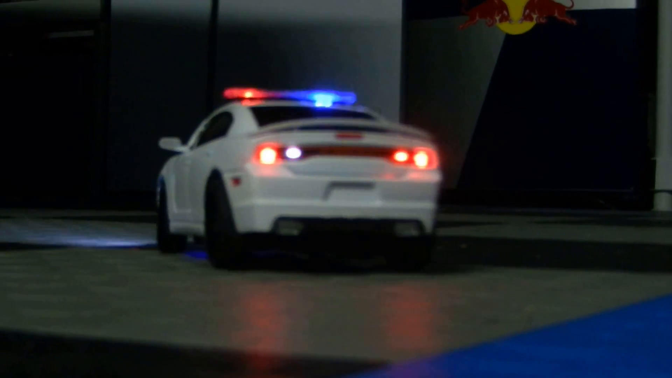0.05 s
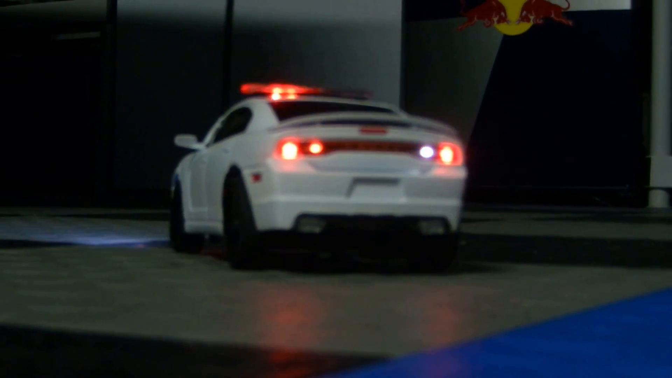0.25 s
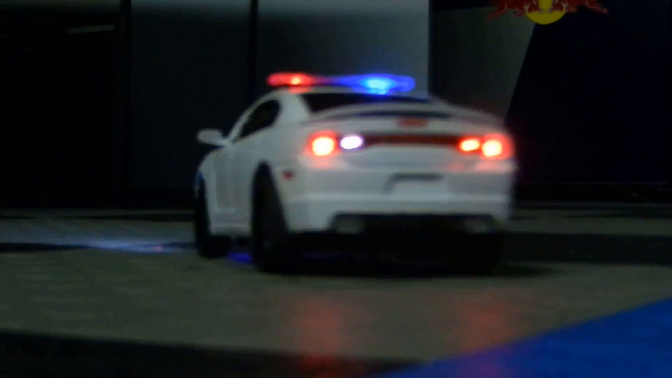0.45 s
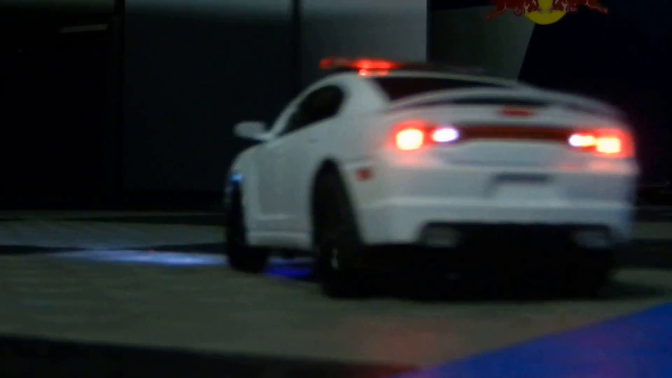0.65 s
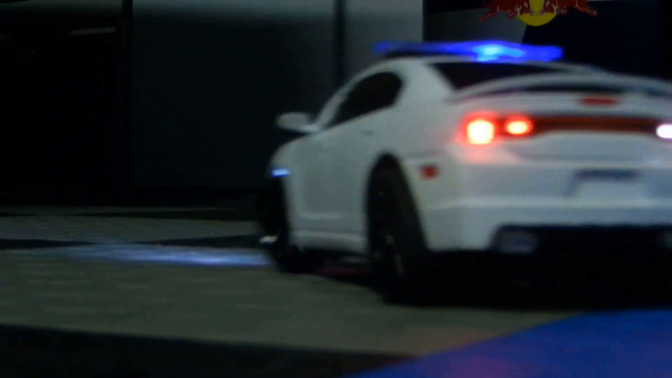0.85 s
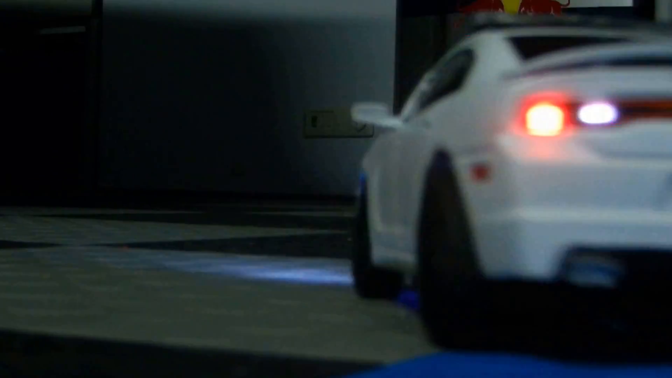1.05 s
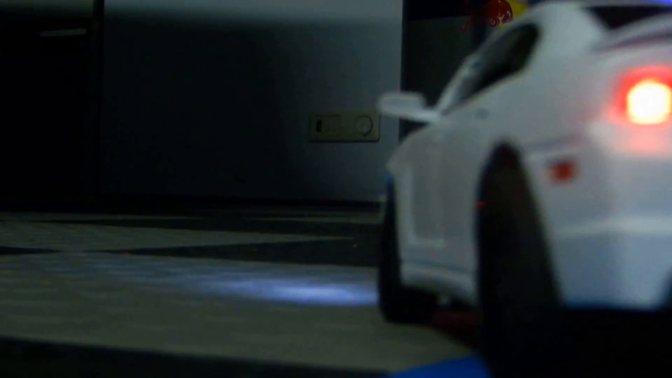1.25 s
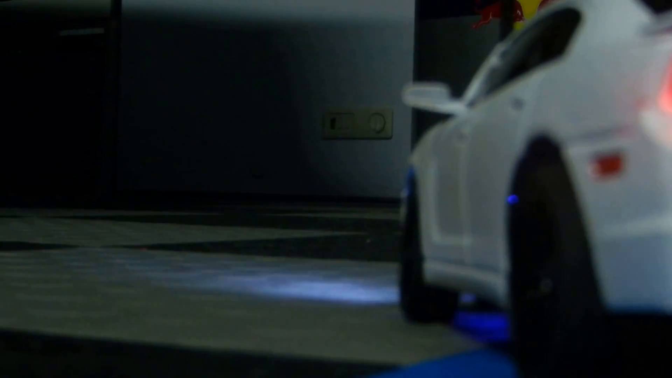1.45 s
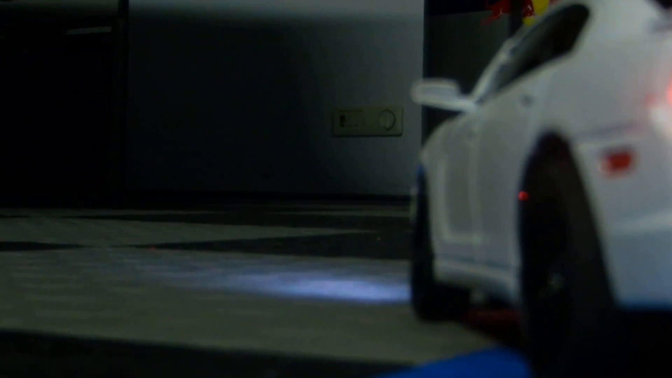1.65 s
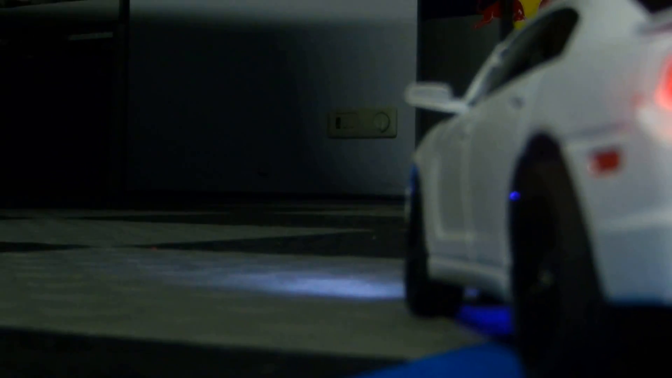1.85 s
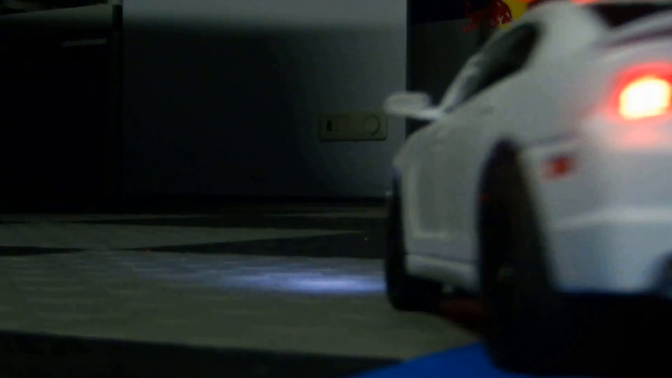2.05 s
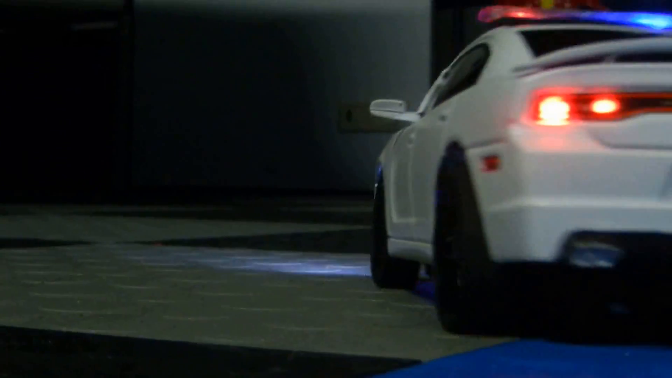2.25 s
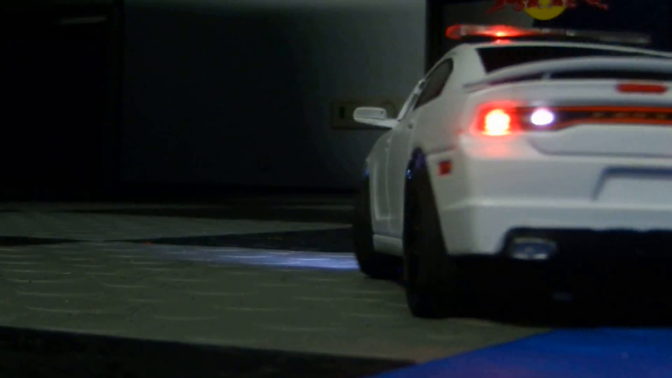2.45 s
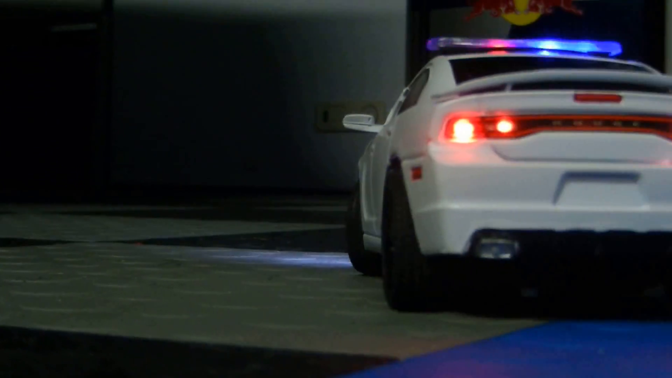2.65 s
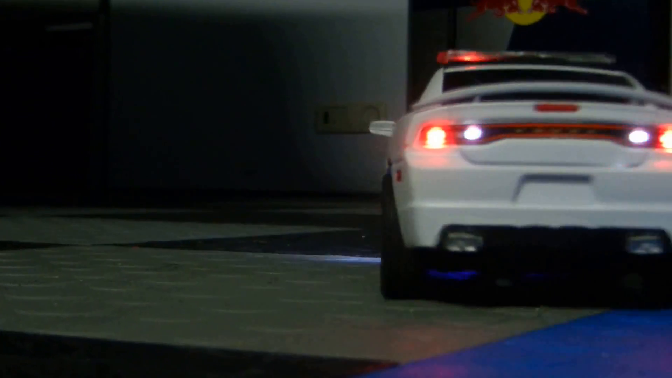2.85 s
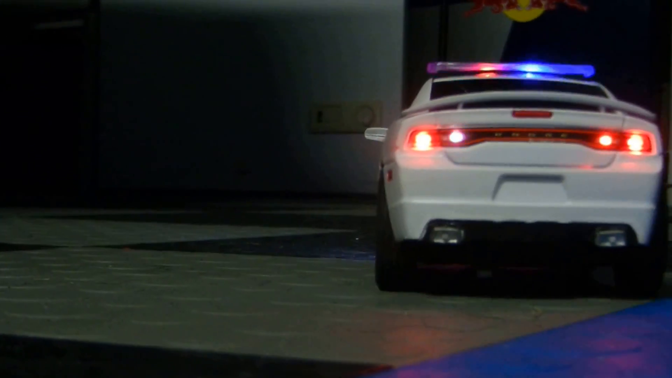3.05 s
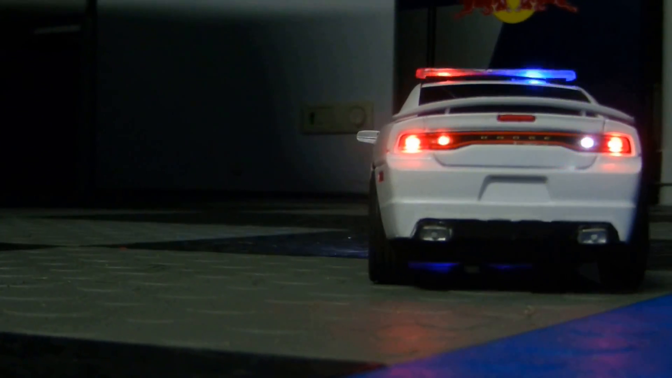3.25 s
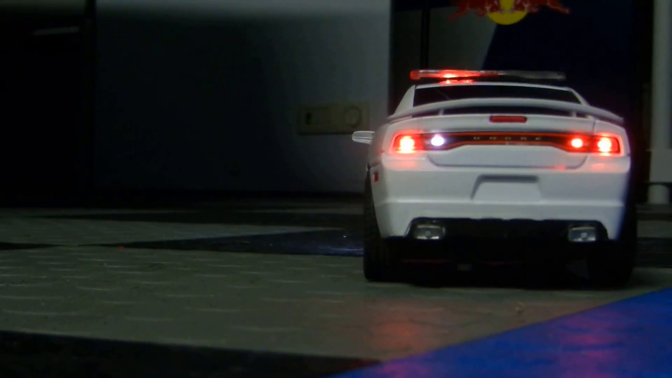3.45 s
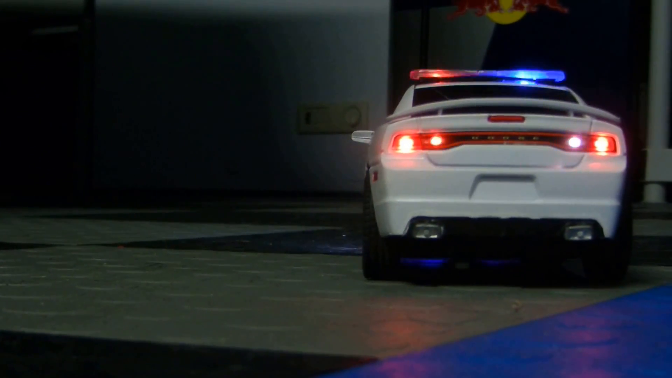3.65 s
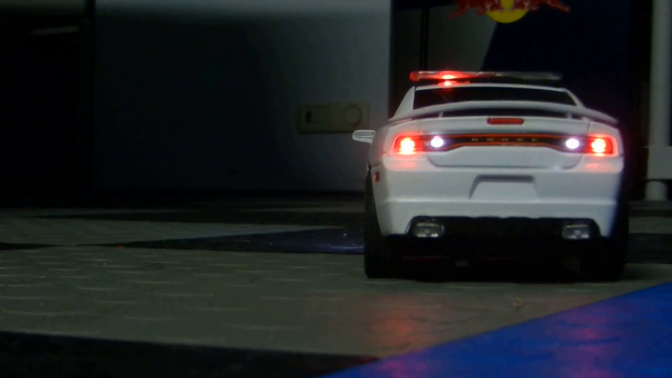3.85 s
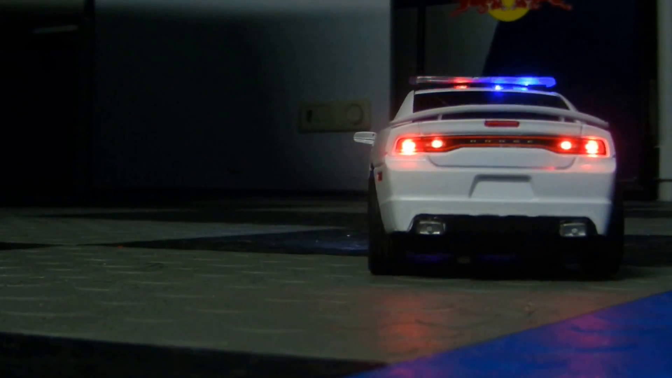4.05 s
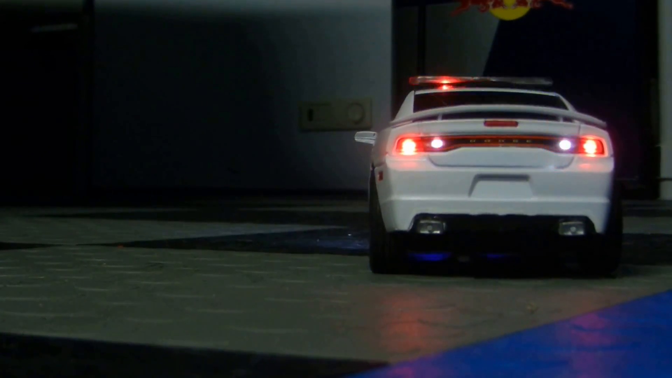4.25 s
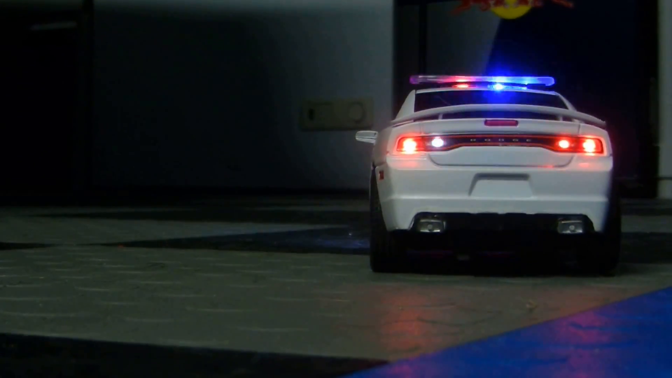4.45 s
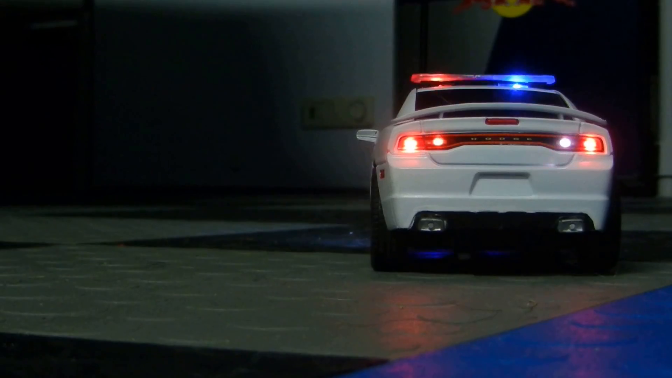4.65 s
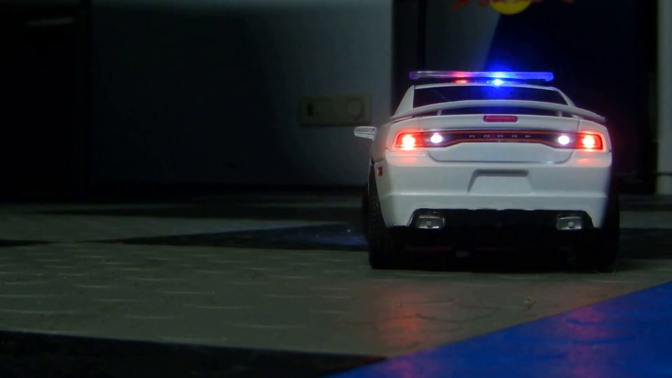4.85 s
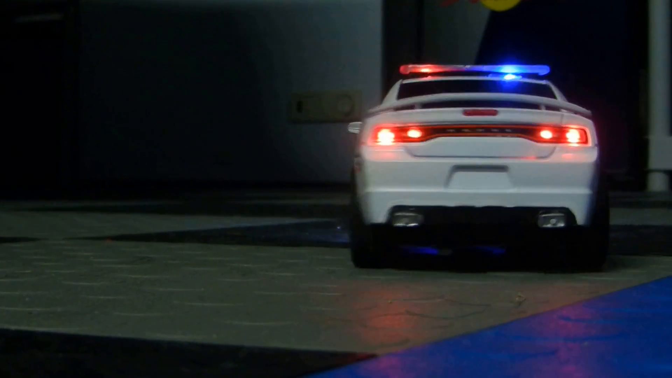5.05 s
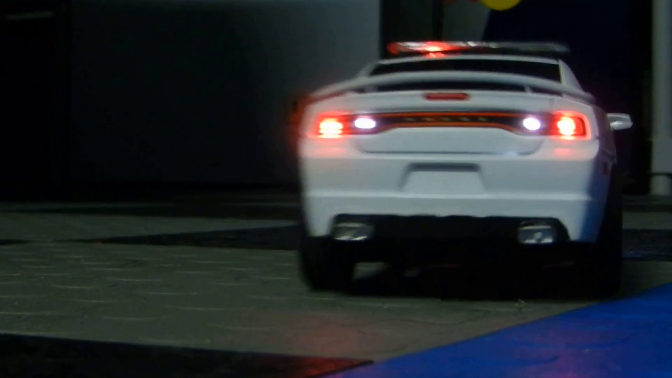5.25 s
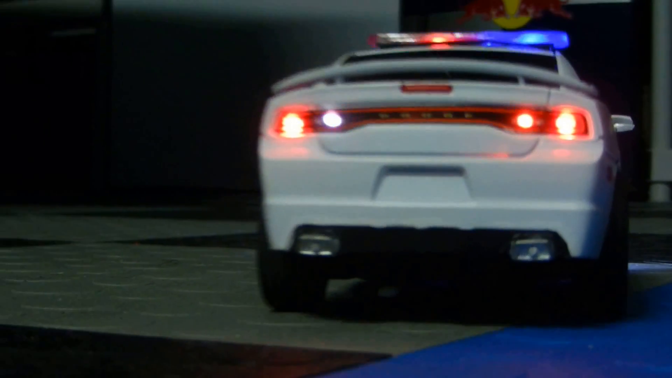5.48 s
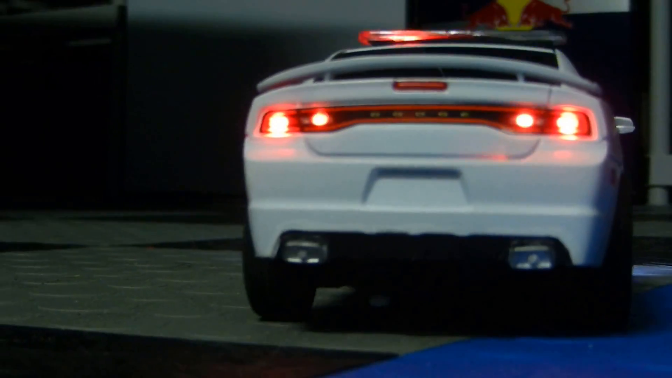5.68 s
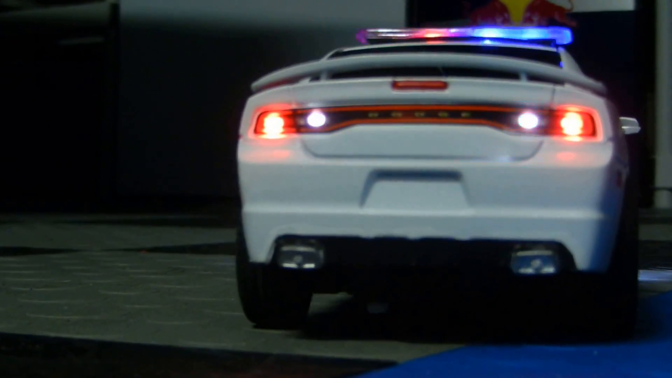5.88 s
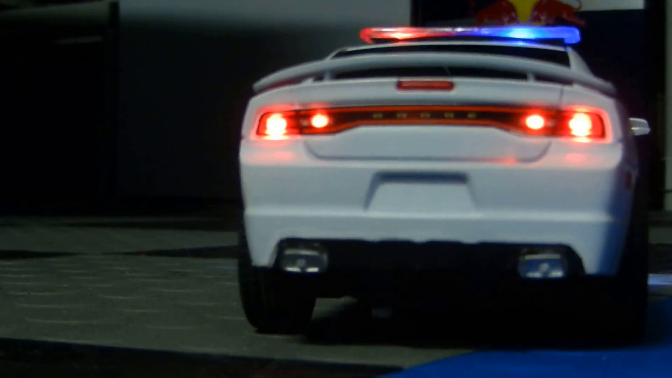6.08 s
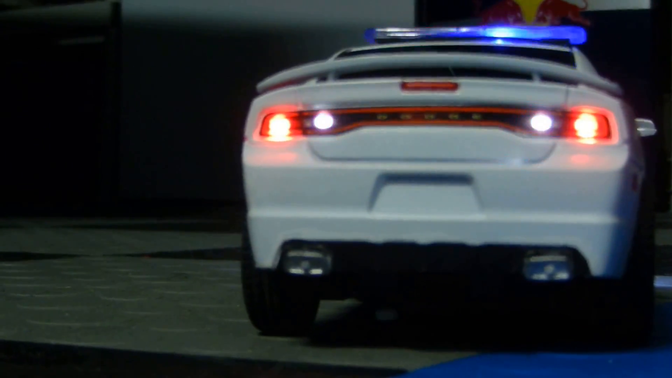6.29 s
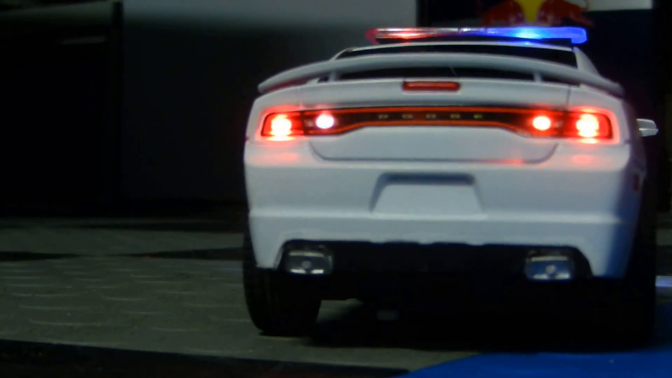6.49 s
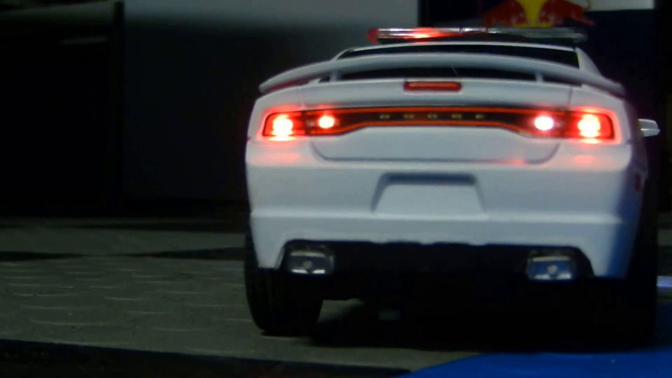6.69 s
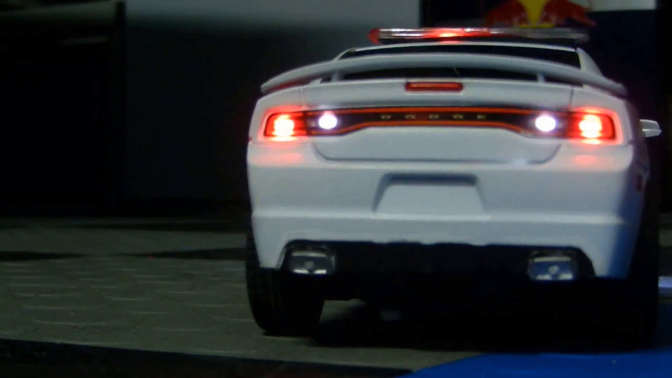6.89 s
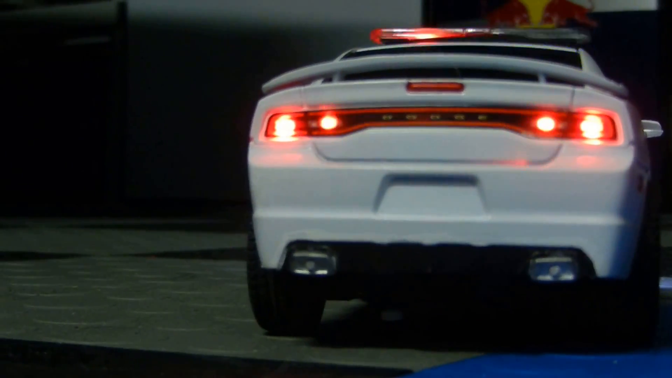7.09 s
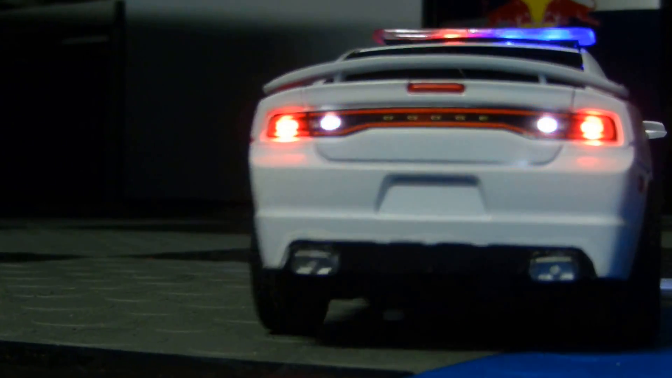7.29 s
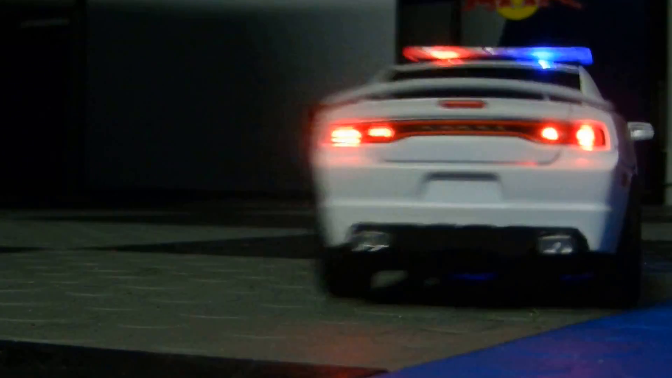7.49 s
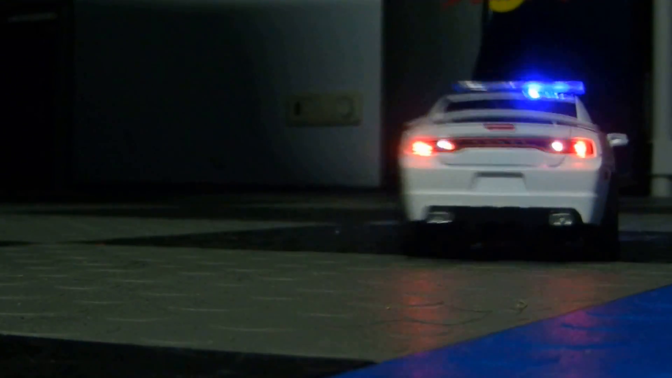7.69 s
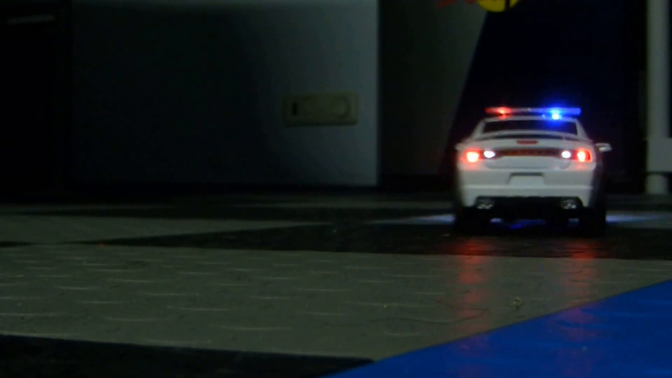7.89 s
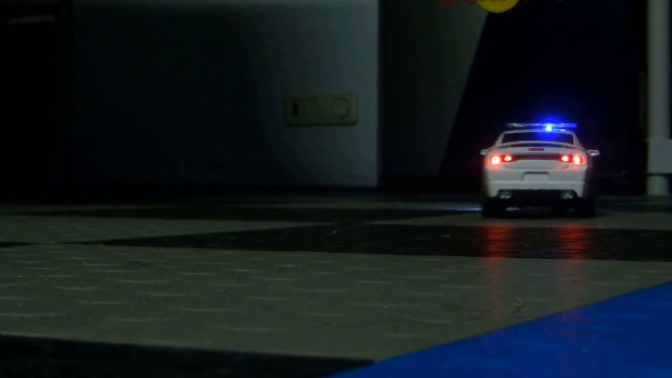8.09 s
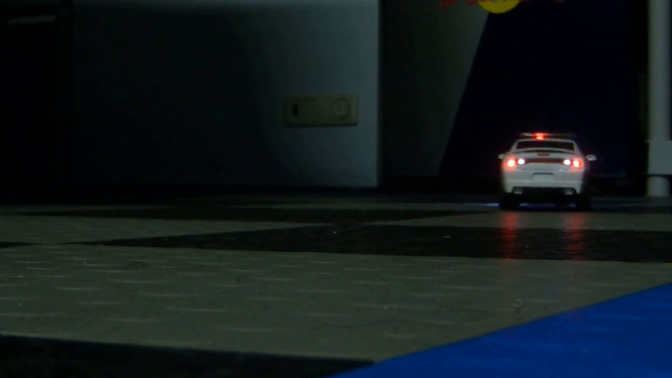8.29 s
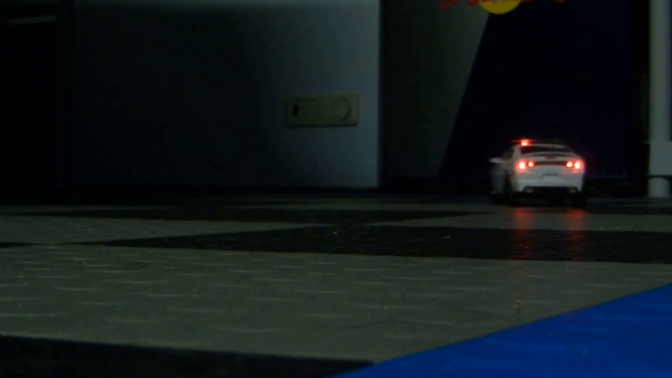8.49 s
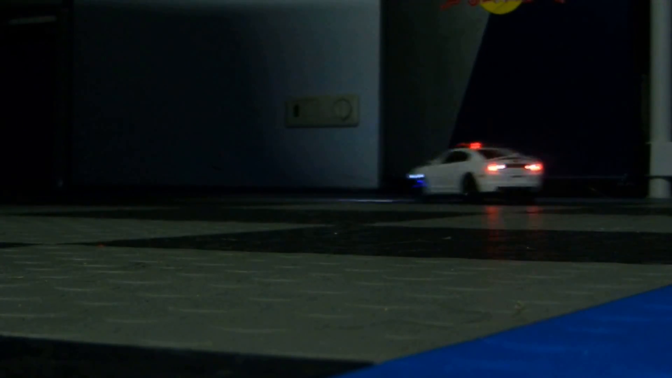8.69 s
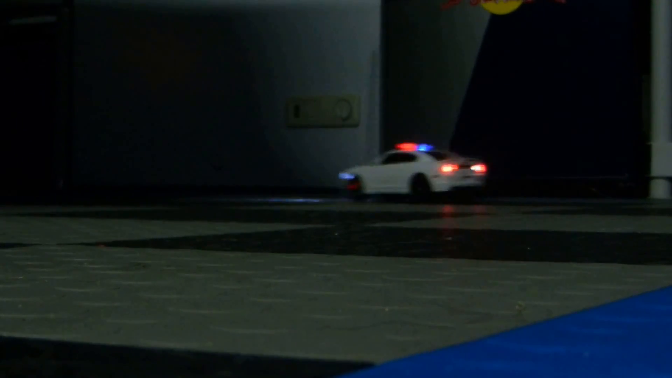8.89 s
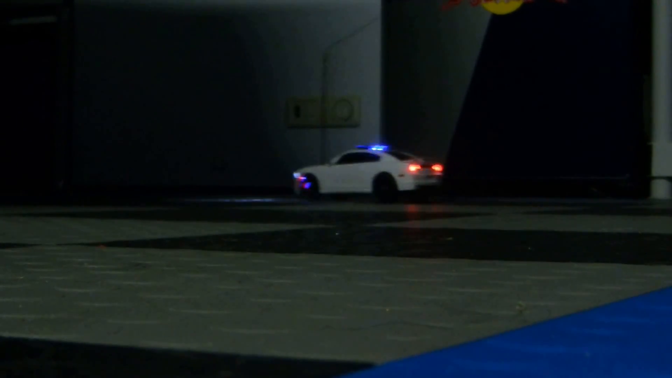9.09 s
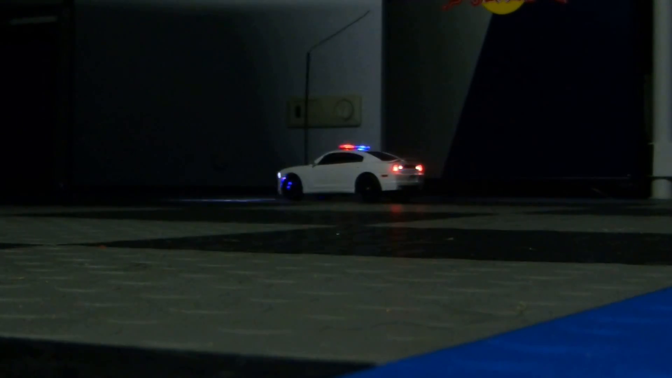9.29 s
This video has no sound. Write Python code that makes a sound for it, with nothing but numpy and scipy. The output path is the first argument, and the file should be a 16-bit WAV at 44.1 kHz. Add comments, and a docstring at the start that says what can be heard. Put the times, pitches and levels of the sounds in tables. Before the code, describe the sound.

Close-up in a quiet reflective indoor space, a remote-control car jerks about: short raspy motor bursts, plastic steering clicks, chattering gears and hollow body knocks, separated by quiet pauses with faint ticks. Finally it accelerates hard away, the gear whine climbing with low tyre rumble and body drone, then slows into chattering knocks and fades. Sound leans to the right.

```python
"""A brief plastic whir fades in quiet room air: a remote-control toy car drives a hard indoor floor in bursts.
Motor speed times the gear teeth, which rattle, whine and shake the hollow body; tyre noise rumbles below.
Shaped noise makes the clicks, knocks and clatter, while decaying sines ring the gearbox and shell.
Then the car speeds off and coasts; a synthetic room answers, louder on the right than on the left."""
import sys
import numpy as np
from scipy import signal
from scipy.fft import rfft, irfft
from scipy.io import wavfile
from scipy.ndimage import uniform_filter1d

SR = 44100
rng = np.random.default_rng(int(sys.argv[2]) if len(sys.argv) > 2 else 0)


def store_wav(level_fs):
    """Save 16-bit WAV to argv[1]."""
    pcm = np.round(np.clip(np.atleast_2d(level_fs), -1, 1) * 32767)
    wavfile.write(sys.argv[1], SR, pcm.T.astype(np.int16))


N = 411453
TIME = np.arange(N) / SR
SIDE_SIGNS = np.array([[1], [-1]])   # side adds to the left and subtracts from the right

# Table levels are relative: each sound adds its own trim where it is made.
# quiet room air: [f/Hz, level/dB per Hz], and its width: [f/Hz, side level/dB]
AIR_COLOUR = [(30, -38), (60, -10.5), (115, 5), (180, -8), (250, -10), (390, 1.5), (550, -7), (900, -11.5),
              (1300, -11.5), (1900, -13), (2800, -14), (4000, -19.5), (8000, -25.5), (15500, -28.5)]
AIR_WIDTH = [(100, -1), (500, 3), (2000, 2), (6000, 2)]
AIR_DB = -51.5

# short pushes of the throttle: [on t/s, off t/s, teeth meeting per s at release,
# gear level/dB at start, at release, body level/dB at start, at release]
THROTTLE_BURSTS = [(-.05, 0.069, 450.2, -37, -37, -39, -40), (.228, .268, 360.9, -27.5, -39, -27.5, -40.5),
                   (.443, 0.621, 520.2, -33, -28.5, -30.5, -27.5),
                   (0.881, 1.001, 521.1, -21, -27.5, -28.5, -25),
                   (2.037, 2.151, 429.9, -41.5, -31, -37, -30),
                   (2.756, 2.776, 298.9, -40, -40.5, -36.5, -44), (2.823, 2.902, 408.5, -36, -36, -41, -32),
                   (3.863, 3.961, 298.9, -42.5, -43.5, -40.5, -40.5),
                   (5.044, 5.22, 509, -31.5, -25, -33, -25.5)]
KICK_TEETH_PER_S, ATTACK_S = 250, 0.00081   # the motor leaps to at least this speed at once
COAST_S = 0.55   # time constant of slowing down with the throttle off
UNLOADED_DROP_DB, UNLOAD_S = 3, 0.034   # the gears quieten as the load comes off
GEAR_FADE_DB_PER_S, BODY_FADE_DB_PER_S, TYRE_FADE_DB_PER_S = 49, 49.5, 54
TYRE_OFFSET_DB = -14   # tyre setting against body setting, before their trims

# motor speed of the long run away: [t/s, teeth meeting per s]
GETAWAY_TOOTH_RATE = [(7.33, 260), (7.43, 760), (7.55, 975), (7.72, 1035), (7.9, 1250), (8.14, 1434),
                      (8.32, 1200), (8.75, 950), (9.33, 500)]
# loudness of the long run away: [t/s, gear level/dB, body level/dB, tyre level/dB]
GETAWAY_LOUDNESS = [(7.34, -55, -44, -46), (7.416, -33, -33.5, -56), (7.488, -24, -28.5, -40),
                    (7.844, -20, -20, -38), (8.032, -23, -17, -43), (8.17, -23.5, -20.5, -44),
                    (8.24, -25, -26.5, -47), (8.32, -27.5, -26.5, -42), (8.42, -24, -23, -54),
                    (8.51, -26.5, -25, -51), (8.62, -32, -32, -40), (8.71, -34, -27.5, -42.5),
                    (9.112, -43.5, -46, -61), (9.33, -47, -53, -61)]
# overall trim of that run: [gear level/dB, body level/dB, tyre level/dB]
GETAWAY_TRIM = (-0.5, 2, -1)

# the car backs up between these times: [from t/s, to t/s]
BACKING_TIMES = [(0.1, 1.9), (4.9, 5.9)]
# gear noise in reverse, driving forward and spinning freely: [f/Hz, level/dB per Hz]
REVERSE_COLOUR = [(350, -18), (750, -5), (1040, 1.5), (1300, -5), (2000, 0.5), (2700, -0.5), (3250, 2),
                  (3700, -3.5), (4200, -14), (8000, -50)]
FORWARD_COLOUR = [(500, -8.5), (900, -3.5), (1090, 3.5), (1260, 2), (1490, 8), (1780, 2.5), (2050, 7.5),
                  (2280, 13), (2600, 2), (2900, 6), (3250, 2), (3700, 5), (4400, 1), (5000, -14),
                  (8000, -61)]
FREE_COLOUR = [(350, -13), (800, -0.5), (1150, 4), (1450, 1), (2300, 3.5), (3100, -5), (4200, -9.5),
               (8000, -58.5)]
# lines of the gear whine: [multiple of the tooth rate, level/dB]
WHINE_LINES = [(2, 4), (3, 2), (4, 0.5)]
WHINE_REVERSE_DB, WHINE_FORWARD_DB, WHINE_FREE_DB = -4, -1, -12   # against the rattle
WHINE_WAVER_DB = 1
GEAR_TEETH = 13

# tooth hiss, hollow body drone and tyre rumble: [f/Hz, level/dB per Hz]
HISS_COLOUR = [(3000, -18), (5000, 8.5), (6800, 5), (8200, -3.5), (10500, -3), (14000, -9), (16000, -33)]
BODY_COLOUR = [(150, -46), (260, -27), (330, -7.5), (375, 1.5), (435, 2.5), (500, 0.5), (570, -4.5),
               (650, -8), (760, -14), (1100, -20), (2500, -100)]
TYRE_COLOUR = [(25, -46), (45, -25), (70, 3), (120, 8), (200, 1), (300, -6), (600, -35)]
HISS_BELOW_GEARS_DB, HISS_SLACK_LOSS_DB = 9, 8.5   # the teeth hiss less when they turn slowly

# decay of the room's tail: [f/Hz, t60/s]
TAIL_DECAY = [(100, 1.5), (450, 0.3), (2300, 1.5), (6000, 0.96), (14000, 0.9)]
# strength of the tail and of the early scatter: [f/Hz, level/dB]
TAIL_STRENGTH = [(100, -9.5), (450, -11.5), (1100, -7), (2300, -4.5), (6000, -5.5), (14000, -6.5)]
EARLY_STRENGTH = [(100, -1), (450, -2.5), (2000, -5), (5000, -2), (12000, 3)]
# width of the reflections, narrow in the lows: [f/Hz, side level/dB]
ROOM_WIDTH = [(120, -4.5), (400, -9.5), (2000, -8), (6000, 0.5)]
SMALL_PARTS_ROOM_DB, THUMP_ROOM_DB, CLATTER_ROOM_DB = -3, -3, 0   # sends to the room

# clicks of steering and loose plastic: [t/s, clack level/dB, snap level/dB, crack level/dB]
CLICK_HITS = [(0.146, -14.5, -20.5, -33.5), (0.207, -10, -40, -49), (0.393, -13.5, -18, -30),
              (0.446, -14, -60, -54), (0.811, -17.5, -19.5, -30.5), (0.887, -12, -24, -50),
              (0.935, -19, -16.5, -28.5), (1.933, -29.5, -40, -54), (2.042, -20, -31.5, -40),
              (3.868, -34, -30, -46), (4.581, -25.5, -47, -53), (4.681, -28, -40.5, -55),
              (4.708, -21.5, -30, -48), (4.99, -21, -23.5, -35.5), (6.998, -18.5, -25.5, -43)]
# their colours: [f/Hz, level/dB per Hz]
CLACK_COLOUR = [(200, -44), (600, -4), (1200, 5.5), (1750, -3), (2600, -10), (6000, -32)]
SNAP_COLOUR = [(1000, -5), (2000, 8), (2700, 5), (3300, 9), (4400, -2), (7000, -26)]
CRACK_COLOUR = [(3000, -36), (5500, 11.5), (7500, 8), (10000, 0), (15500, -18)]

# jolts through the drive train: [t/s, thump level/dB, clatter level/dB, crack level/dB]
JOLT_HITS = [(.260, -15, -32, -43), (0.446, -14, -49, -60), (1.003, -15, -40, -55), (1.014, -8, -29, -37),
             (2.462, -25, -21.5, -22.5), (2.4638, 0, -21, -24.5), (2.479, -8.5, -28.5, -39),
             (3.871, -20.5, -44, -60), (4.811, -31, -21, -21), (4.815, -12, -35, -37),
             (4.823, -15, -18, -26), (4.837, -15, -26, -45), (5.048, -19, -29, -57), (7.0939, -8, -16, -24),
             (7.1, -24, -24.5, -37), (7.1059, -6, -25, -42), (7.125, -18, -40, -55),
             (7.330, -24.5, -34.5, -62)]
# ringing of the hollow body after a jolt: [f/Hz, level/dB, t60/s]
SHELL_MODES = [(118, -14, .14), (345, -7, .08), (388, -4, .09), (436, -1, .11), (510, -4, .07),
               (660, -9, .06)]
PUNCH_HZ, PUNCH_PEAK_S = 475, 0.0027   # the shell flexes for a few cycles
RING_TRIM_DB, RING_RISE_S = -15, 0.007
# colours of the jolt's clatter and crack: [f/Hz, level/dB per Hz]
CLATTER_COLOUR = [(150, -6), (600, 1), (1200, -4), (2100, 2), (3000, -6), (5200, -16), (7500, -22),
                  (11000, -29), (15500, -37)]
JOLT_CRACK_COLOUR = [(1500, -14), (3500, -1), (5400, 6), (7200, -8), (10500, 1), (14000, -7.5),
                     (16000, -16)]

# a loose gear knocks about in its play: [t/s, clack level/dB, rasp level/dB]
LOOSE_GEAR_HITS = [(.576, -26, -27.5), (.680, -37, -25.5), (0.76, -48, -27), (0.914, -22, -36),
                   (.984, -20, -21.5), (1.023, -19, -21), (1.041, -29, -20.5), (1.083, -36, -22.5),
                   (1.107, -29, -25.5), (1.132, -45, -25.5), (1.140, -38, -28), (1.163, -51, -27.5),
                   (1.199, -48, -28), (1.229, -40, -29.5), (1.238, -34, -31), (1.267, -37.5, -23.5),
                   (1.310, -42, -29), (1.366, -54, -35), (1.435, -48, -40), (1.477, -31.5, -54),
                   (1.488, -35.5, -35), (1.68, -42, -43.5), (1.739, -48, -41), (2.096, -44, -27.5),
                   (2.125, -46, -21), (2.143, -45, -27), (2.167, -30, -21.5), (2.202, -31, -31),
                   (2.231, -30, -30.5), (2.259, -31, -36), (2.288, -41, -36), (2.328, -27, -33),
                   (2.362, -25.5, -27.5), (2.861, -54, -31), (2.960, -37, -39), (2.993, -32, -40),
                   (3.035, -39, -41), (3.082, -40.5, -42), (3.136, -35, -46), (3.909, -54, -37),
                   (3.955, -35, -40), (4.007, -39, -48), (4.086, -39, -55), (4.240, -46, -52),
                   (5.165, -28, -42), (5.213, -23, -27), (5.253, -45, -25), (5.299, -37, -31),
                   (5.321, -36, -30), (5.363, -43, -30.5), (5.386, -39, -26), (5.408, -36, -28),
                   (5.441, -48, -30), (5.508, -37, -30), (5.545, -29.5, -33.5), (5.587, -27.5, -31.5),
                   (5.614, -31, -36), (7.428, -34, -28), (8.777, -31, -32), (8.918, -31, -28.5),
                   (9.045, -33, -33), (9.178, -33, -47), (9.246, -39, -40)]
# its colours: [f/Hz, level/dB per Hz]
GEAR_CLACK_COLOUR = [(250, -25), (450, -11), (750, -5.5), (1180, 2.5), (1700, -6), (2600, -26), (6000, -27),
                     (14000, -45)]
GEAR_RASP_COLOUR = [(900, -20), (1600, 2.5), (2300, 5.5), (3000, 1.5), (4300, -6.5), (5200, -10.5),
                    (7500, -18.5), (10000, -19.5), (15000, -43)]
# ringing of the gearbox under a knock: [f/Hz, level/dB, t60/s]
GEARBOX_RING = [(1590, -7, .025), (2137, -2, 0.032), (2365, 0, 0.032), (2743, -5, 0.024),
                (3060, -3.5, 0.025), (3490, -7, 0.018), (3760, -7, 0.022), (4400, -5, .018)]

# rough floor shakes the car: [t/s, body level/dB, gear level/dB, tyre level/dB]
FLOOR_SPOTS = [(.615, 5.5, 1, -1), (2.92, 3.5, 3, 5), (7.645, 8.5, 1, 0), (8.13, 3, 1, 1),
               (8.205, 4, 1.5, 9), (8.285, 8.5, 2, 6), (8.371, 6, -3.5, -5), (8.495, 6.5, 0.5, 0)]
ROUGH_SPOT_S = 0.028   # half width of the change, at 1/e

# faint hollow ticks while the car stands or creeps: [t/s, level/dB]
TICK_HITS = [(1.4964, -39), (1.6094, -30.5), (1.6962, -39), (1.7701, -36.5), (1.9036, -37), (4.3395, -42),
             (4.6925, -28), (6.074, -42), (6.1404, -45), (6.2073, -48), (6.2736, -43), (6.341, -47),
             (6.4068, -45), (6.4737, -43), (6.5071, -45), (6.6074, -47), (6.7072, -41), (6.8079, -44),
             (6.9082, -46), (9.1775, -28.5)]
# what a tick rings with: [f/Hz, level/dB, t60/s]
TICK_RING = [(1125, -5, .035), (1290, -1, 0.038), (1483, -1, 0.028)]

# the loose gear knocks once per turn while coasting at speed
CHATTER_ABOVE_TEETH_PER_S = 560
CHATTER_TRIM_DB, CHATTER_SPREAD_DB = 2, 2   # trim over the gear setting, at 450 teeth per s
CHATTER_DB_PER_HALVING = 5.5   # it stands out more with every halving of the speed

# the left ear against the right: [f/Hz, level/dB]
LEFT_EAR_COLOUR = [(100, -1.5), (350, -4), (1500, -4.5), (2800, -3.5), (4500, -1), (8000, 2), (12000, -2.5)]
CUTOFF_HZ = 15900


def from_db(db):
    """Decibels to an amplitude factor."""
    return 10 ** (np.asarray(db) / 20)


def rms_one(x):
    """Scales a sound to rms 1."""
    return x / np.sqrt(np.mean(x ** 2) + 1e-20)


def in_time(rows):
    """Each column of a curve at every sample."""
    s, *columns = np.transpose(rows)
    return [np.interp(TIME, s, column) for column in columns]


def at_hz(points, hz):
    """A spectrum read on a log-frequency axis."""
    f, value = np.transpose(points)
    return np.interp(np.log(np.maximum(hz, 1)), np.log(f), value)


def drift(rate):
    """Slow chance with spread 1, drawing the given number of new values per second."""
    knots = rng.standard_normal(N // 10)
    return rms_one(np.interp(TIME * rate, np.arange(len(knots)), knots))


def colour(x, spectrum, size=4096):
    """Causal (minimum-phase) filter with the given spectrum."""
    gain = from_db(at_hz(spectrum, np.fft.rfftfreq(size, 1 / SR)))
    cepstrum = irfft(np.log(gain))
    # folding the cepstrum forward gives minimum phase
    cepstrum[1:size // 2] *= 2
    cepstrum[size // 2 + 1:] = 0
    return signal.oaconvolve(x, irfft(np.exp(rfft(cepstrum))))[:len(x)]


def evened(x, span):
    """Holds the rms near 1 over the given span in seconds."""
    power = np.abs(uniform_filter1d(x ** 2, int(span * SR)))
    return x / np.sqrt(power + 1e-4 * np.mean(x ** 2))


def add(track, s, sound):
    """Lays a sound into a track at a time in seconds."""
    start = max(int(s * SR), 0)
    track[start:start + len(sound)] += sound[:N - start]


def background():
    """Quiet room air: coloured noise in mid and side, with its own width in each band."""
    mid, side = (rms_one(colour(rng.standard_normal(N), AIR_COLOUR)) for _ in range(2))
    return from_db(AIR_DB) * (mid + colour(side, AIR_WIDTH) * SIDE_SIGNS)


def burst(on, off, top, gear_start_db, gear_end_db, body_start_db, body_end_db, rolling_rate):
    """One push: speed and loudness ramp while the throttle is held, then die away as the car coasts."""
    held = np.clip((TIME - on) / (off - on), 0, 1)
    coasted = np.maximum(TIME - off, 0)
    start = max(rolling_rate, KICK_TEETH_PER_S)
    rate = (start + (top - start) * held) * np.exp(-coasted / COAST_S)
    attack_db = 20 * np.log10(np.clip((TIME - on) / ATTACK_S, 1e-3, 1))
    gear_db = attack_db + gear_start_db + (gear_end_db - gear_start_db) * held
    body_db = attack_db + body_start_db + (body_end_db - body_start_db) * held
    unloaded_db = UNLOADED_DROP_DB * np.minimum(coasted / UNLOAD_S, 1)
    return np.array([rate,
                     gear_db - unloaded_db - GEAR_FADE_DB_PER_S * coasted,
                     body_db - BODY_FADE_DB_PER_S * coasted,
                     body_db + TYRE_OFFSET_DB - TYRE_FADE_DB_PER_S * coasted])


def motion():
    """Tooth rate and levels of gears, body and tyres; each push takes over, then the car speeds off."""
    state = np.zeros((4, N))
    for row in THROTTLE_BURSTS:
        start = max(int(row[0] * SR), 0)
        state[:, start:] = burst(*row, state[0, start])[:, start:]
    levels = [db + trim for db, trim in zip(in_time(GETAWAY_LOUDNESS), GETAWAY_TRIM)]
    getaway = in_time(GETAWAY_TOOTH_RATE) + levels   # joins two lists of curves
    return np.where(TIME < GETAWAY_TOOTH_RATE[0][0], state, getaway)


def teeth(turns, uneven_db, rub):
    """One impact per tooth, each of its own strength, with sliding friction in between."""
    meets = np.diff(np.floor(turns), prepend=0) > 0
    impacts = meets * from_db(uneven_db * np.clip(rng.standard_normal(N), -2, 2))
    return evened(impacts, 0.097) + rub * rng.standard_normal(N)


def wheel_throb(turns, depth_db):
    """An off-centre gear binds once per turn."""
    bind = (0.5 + 0.5 * np.cos(2 * np.pi * turns / GEAR_TEETH)) ** 2
    return from_db(depth_db * bind)


def gear_whine(turns):
    """Multiples of the tooth rate; loose shafts wobble, smearing each line into a narrow band."""
    whine = np.zeros(N)
    for multiple, db in WHINE_LINES:
        level = from_db(db + WHINE_WAVER_DB * drift(25)) * (0.5 * drift(300) + 1)
        whine += level * np.sin(2 * np.pi * multiple * turns + 0.82 * drift(400))
    return whine


def gear_noise(rate, turns, impacts):
    """Impacts and whine sound through the gearbox, coloured by which tooth flanks bear the load."""
    speeding_up = 1. * (np.gradient(rate) > 0)
    pulling = np.clip(uniform_filter1d(speeding_up, size=2000), 0, 1)   # powered while speeding up
    backing = sum((TIME > start) & (TIME < end) for start, end in BACKING_TIMES)
    states = [(pulling * backing, REVERSE_COLOUR, WHINE_REVERSE_DB),
              (pulling * (1 - backing), FORWARD_COLOUR, WHINE_FORWARD_DB),
              (1 - pulling, FREE_COLOUR, WHINE_FREE_DB)]
    whine = gear_whine(turns)
    out = np.zeros(N)
    for share, spectrum, whine_db in states:
        rattle = evened(colour(impacts, spectrum), 0.13)
        out += share * (rattle + from_db(whine_db) * evened(colour(whine, spectrum), 0.11))
    return out


def drive(rate, gear_db, body_db, tyre_db):
    """Motor speed sets the rhythm of the teeth, which shake gearbox and body; the tyres rumble beneath."""
    turns = np.cumsum(rate * (1 + 0.035 * drift(300) + 0.012 * drift(25))) / SR   # counted in teeth
    slack = np.clip(450 / rate, 0, 1)   # slow gears knock about in their play
    shake = wheel_throb(turns, depth_db=0.58 * slack) * from_db(3.35 * slack * drift(130))
    bouncing = turns + 0.0003 * rate * drift(900)   # fast teeth meet early or late
    impacts = teeth(bouncing, uneven_db=6.5, rub=0.9) * shake
    gear_level_db = gear_db - 2.5
    gears = from_db(gear_level_db) * gear_noise(rate, turns, impacts)
    hiss_db = gear_level_db - HISS_BELOW_GEARS_DB - HISS_SLACK_LOSS_DB * slack
    hiss = from_db(hiss_db) * evened(colour(impacts, HISS_COLOUR), 0.31)
    bumps = teeth(turns, uneven_db=7.0, rub=0.86) * rng.choice([-1, 1], N) * shake
    body = from_db(body_db + 0.5) * evened(colour(bumps, BODY_COLOUR), 0.055)
    tyres = from_db(tyre_db + 3.0) * evened(colour(rng.standard_normal(N), TYRE_COLOUR), 0.23)
    rolling = np.clip(rate / 140, 0, 1)   # all of it dies away as the car comes to rest
    return rolling * (gears + hiss + body + tyres + chatter(rate, turns, gear_db))


def room_response():
    """Early scatter from floor and walls, then a tail that dies band by band; rows are mid and side."""
    t = np.arange(SR) / SR
    edges = np.geomspace(45, 17000, num=13)
    response = np.zeros((2, SR))
    for low, high in zip(edges, edges[1:]):
        hz = np.sqrt(low * high)
        band = signal.butter(2, [low, high], "band", fs=SR, output="sos")
        noise = signal.sosfilt(band, rng.standard_normal((2, SR)))
        early = rms_one((t > 0.0007) * from_db(-60 * t / 0.095))
        tail_fade = from_db(-60 * t / at_hz(TAIL_DECAY, hz))
        late = rms_one(np.clip(t / 0.016 - 0.5, 0, 1) * tail_fade)
        early_gain, late_gain = from_db(at_hz(EARLY_STRENGTH, hz)), from_db(at_hz(TAIL_STRENGTH, hz))
        response += noise * (early_gain * early + late_gain * late)
    return response / np.sqrt(SR)


def at_ears(mid, side):
    """Reflections as the left and right ear hear them."""
    return (mid + colour(side, ROOM_WIDTH) * SIDE_SIGNS) / np.sqrt(2)


def room(x, rate, count=3):
    """The reflections change as the car rolls from spot to spot."""
    travel = np.cumsum(rate) / SR / 170
    wet = 0
    for k in range(count):
        share = np.sqrt(2 / count) * np.cos(np.pi * (travel + k / count))
        wet = wet + signal.fftconvolve((share * x)[None], room_response(), axes=1)[:, :N]
    return at_ears(*wet)


def contact(spectrum, t60, attack_s=0.00107, size=4096, count=4):
    """Plastic chattering for an instant, with no pitch of its own; rms 1 over its first 4 ms."""
    t = np.arange(size) / SR
    fade = (1 - np.exp(-t / attack_s)) * from_db(-60 * t / t60)
    hit = rng.standard_normal(size) * fade
    for _ in range(count):   # even out chance resonances
        flat = irfft(np.exp(1j * np.angle(rfft(hit))))
        hit = flat * np.minimum(10 * fade / fade.max(), 1)
    hit = colour(hit, spectrum)
    return hit / np.sqrt(np.mean(hit[t < 0.004] ** 2))


def clicks():
    """Small plastic parts hit their stops: a crack, then a snap and a duller clack."""
    out = np.zeros(N)
    for s, clack_db, snap_db, crack_db in CLICK_HITS:
        add(out, s - 0.0004, from_db(clack_db - 13.0) * contact(CLACK_COLOUR, t60=0.02))
        add(out, s - 0.0006, from_db(snap_db - 2.0) * contact(SNAP_COLOUR, t60=0.0074))
        add(out, s - 0.001, from_db(crack_db - 2.5) * contact(CRACK_COLOUR, t60=0.0073))
    return out


def thumps():
    """As the drive train takes up its play the shell punches once, then the hollow body rings unevenly."""
    out, t = np.zeros(N), np.arange(SR // 2) / SR
    swell = (t / PUNCH_PEAK_S * np.exp(1 - t / PUNCH_PEAK_S)) ** 4
    punch = swell * np.sin(2 * np.pi * PUNCH_HZ * t)
    rise = (1 - np.exp(-t / RING_RISE_S)) ** 2
    for s, thump_db, _, _ in JOLT_HITS:
        ring = np.zeros(len(t))
        for hz, db, t60 in SHELL_MODES:
            strength, pitch, phase = rng.standard_normal(3)
            fade = from_db(db + 3.4 * strength - 60 * t / t60)
            ring += fade * np.sin(2 * np.pi * (hz * (1 + 0.03 * pitch) * t + phase))
        add(out, s, from_db(thump_db) * (punch + from_db(RING_TRIM_DB) * ring * rise))
    return out


def clatters(count=6):
    """Each jolt cracks and clatters at different spots of the car, each with its own reflections; stereo."""
    tracks = np.zeros((3, N))   # dry, mid and side
    responses = [room_response() for _ in range(count)]
    hits = []
    for s, _, clatter_db, crack_db in JOLT_HITS:
        hits.append((s, from_db(clatter_db + 0.5) * contact(CLATTER_COLOUR, t60=0.035)))
        hits.append((s, from_db(crack_db - 2.5) * contact(JOLT_CRACK_COLOUR, t60=0.014)))
    for k, (s, hit) in enumerate(hits):
        wet = signal.fftconvolve(hit[None], responses[k % count], axes=1)
        for track, sound in zip(tracks, [hit, *wet]):
            add(track, s, sound)
    dry, mid, side = tracks
    return dry + from_db(CLATTER_ROOM_DB) * at_ears(mid, side)


def ringing(modes, spread_db, detune, attack_s, size=4096):
    """A struck part shares each blow's force among its modes differently; rms 1 over its first 8 ms."""
    t, sound = np.arange(size) / SR, 0
    for hz, db, t60 in modes:
        strength, pitch, phase = rng.standard_normal(3)
        fade = from_db(db + spread_db * strength - 60 * t / t60)
        sound = sound + fade * np.sin(2 * np.pi * (hz * (1 + detune * pitch) * t + phase))
    sound = sound * (1 - np.exp(-t / attack_s)) ** 2
    return sound / np.sqrt(np.mean(sound[t < 0.008] ** 2))


def gear_knocks():
    """The loose gear strikes with a dull clack and a short rasp of teeth, and the gearbox rings."""
    out = np.zeros(N)
    for s, clack_db, rasp_db in LOOSE_GEAR_HITS:
        clack = contact(GEAR_CLACK_COLOUR, t60=0.04, attack_s=0.0016)
        add(out, s - 0.001, from_db(clack_db - 4.0) * clack)
        rasp = contact(GEAR_RASP_COLOUR, t60=0.026, attack_s=0.0022)
        ring = ringing(GEARBOX_RING, spread_db=4, detune=0.02, attack_s=0.0012)
        add(out, s - 0.0015, from_db(rasp_db - 6.0) * (rasp + ring))
    return out


def rough_spots():
    """The dB by which body, gears and tyres change as the wheels cross uneven floor."""
    swells = np.array([np.exp(-((TIME - s) / ROUGH_SPOT_S) ** 2) for s, *_ in FLOOR_SPOTS])
    return np.array(FLOOR_SPOTS)[:, 1:].T @ swells


def ticks():
    """Small hollow ticks from inside the car, each a few short ringing modes."""
    out = np.zeros(N)
    for s, db in TICK_HITS:
        tick = ringing(TICK_RING, spread_db=2.5, detune=0.038, attack_s=0.0012)
        add(out, s - 0.001, from_db(db - 7.0) * tick)
    return out


def chatter(rate, turns, gear_db):
    """Coasting at speed, the loose gear knocks once per turn, ever more clearly as it slows."""
    out = np.zeros(N)
    coasting = (np.diff(rate) < 0) & (rate[1:] > CHATTER_ABOVE_TEETH_PER_S)
    full_turn = np.diff(turns // GEAR_TEETH) > 0
    level_db = gear_db + CHATTER_TRIM_DB + CHATTER_DB_PER_HALVING * np.log2(450 / rate)
    for i in np.flatnonzero(full_turn & coasting):
        knock_db = level_db[i] + CHATTER_SPREAD_DB * rng.standard_normal()
        add(out, i / SR, from_db(knock_db) * contact(GEAR_RASP_COLOUR, t60=0.029))
    return out


def scene():
    """Car and room reach the right ear louder than the left, over quiet air."""
    rate, gear_db, body_db, tyre_db = motion()
    body_swell_db, gear_swell_db, tyre_swell_db = rough_spots()
    car = drive(rate, gear_db + gear_swell_db, body_db + body_swell_db, tyre_db + tyre_swell_db)
    small_parts = clicks() + gear_knocks() + ticks()
    shell = thumps()
    room_send = car + from_db(SMALL_PARTS_ROOM_DB) * small_parts + from_db(THUMP_ROOM_DB) * shell
    reflections = room(room_send, rate)
    left, right = from_db(-0.01) * (car + small_parts + shell + clatters() + reflections)
    return np.array([colour(left, LEFT_EAR_COLOUR), right]) + background()


def record(dry):
    """Peaks stop at full scale, then a steep low-pass cuts the top."""
    low_pass = signal.ellip(10, 0.1, 80, CUTOFF_HZ, fs=SR, output="sos")
    return signal.sosfilt(low_pass, np.clip(dry, -1, 1))


dry = scene()
out = record(dry)
store_wav(out)
```